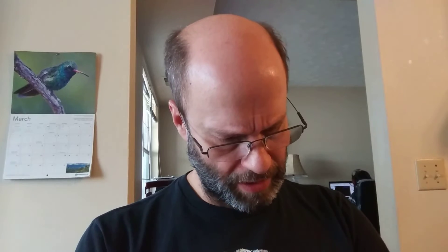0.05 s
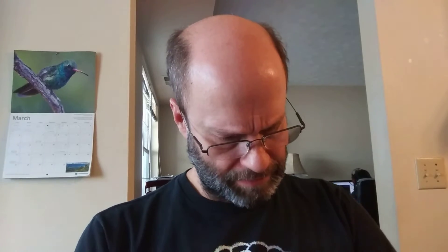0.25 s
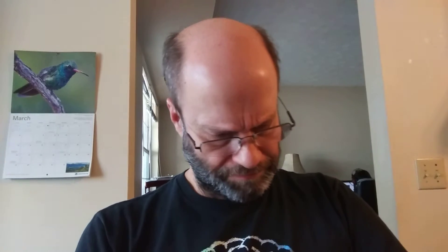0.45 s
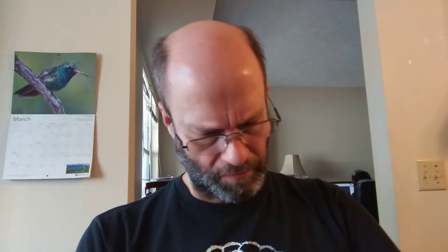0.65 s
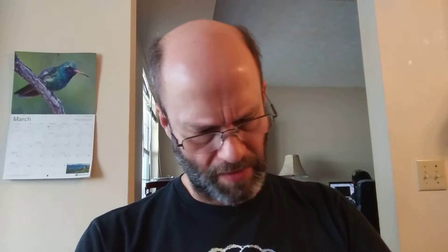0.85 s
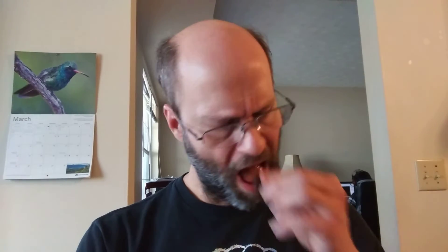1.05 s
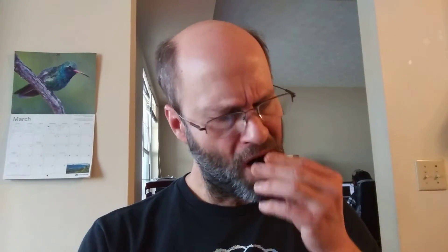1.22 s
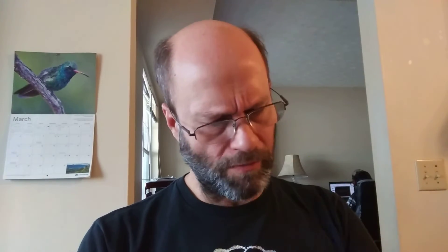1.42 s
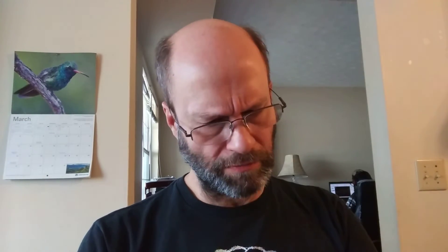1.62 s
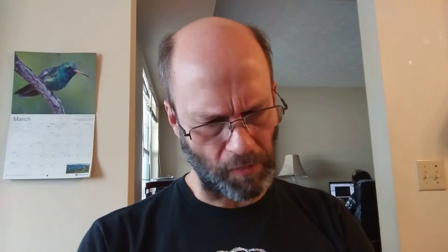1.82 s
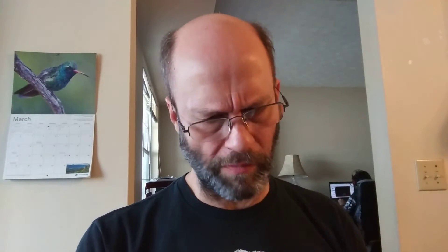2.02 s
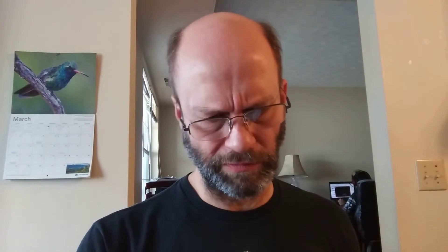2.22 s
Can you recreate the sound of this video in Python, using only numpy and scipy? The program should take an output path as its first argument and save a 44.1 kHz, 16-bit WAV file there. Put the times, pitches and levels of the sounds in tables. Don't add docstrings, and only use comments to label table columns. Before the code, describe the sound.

One crisp, brittle chocolate snap rings briefly in a small, hard-walled room, after tiny foil ticks and before quiet rustling, soft hand knocks and a light tooth click, close to a small microphone with faint hiss.

```python
import sys
import numpy as np
from scipy import signal
from scipy.fft import rfft, irfft, next_fast_len
from scipy.io import wavfile
from scipy.ndimage import uniform_filter1d, map_coordinates

SR = 44100
rng = np.random.default_rng(int(sys.argv[2]) if len(sys.argv) > 2 else 0)


def wav_out(sig):
    wavfile.write(sys.argv[1], SR, np.round(np.clip(np.atleast_2d(sig).T, -1, 1) * 32767).astype(np.int16))


def linear_from_db(decibels):
    return 10 ** (np.asarray(decibels, float) / 20)


N = 100107

# start_s, level_db
CRACKS = [
    (.4055, -9),
    (.4063, -6),
    (.40675, -7),
    (.4072, -9),
    (.4081, -9),
    (.409, -11),
    (.4105, -18),
    (.412, -20),
]
# pitch_hz, level_db, t60_s
BAR_MODES = [(361.8, -24, 0.023), (689.5, -20, 0.025), (1046, -18.5, 0.0092), (1870, -12.5, 0.012),
             (3030, -15, .01), (4488, -7.5, 0.0043), (6970, -11, 0.0059), (9950, -15, 0.002),
             (13900, -18, 0.0036)]
# start_s, peak_db
GLINTS = [(.4142, -6.5), (0.4167, -2), (0.418, -6.5), (0.4202, -5.5), (0.4218, -6.5), (0.4238, -8),
          (0.4284, -7), (0.43, -8.5), (0.4312, -10.5), (0.4336, -8.5), (0.4355, -11), (0.4382, -10.5),
          (0.4395, -10.5), (0.4405, -9), (0.4459, -12.5), (0.4474, -12.5), (0.4489, -10), (0.4505, -13.5),
          (0.4522, -13), (0.4558, -14), (0.4613, -15), (0.4648, -16), (0.4717, -17), (0.4734, -16.5),
          (0.4756, -18), (0.4779, -16), (0.4823, -20.5)]
# delay_s, level_db
WALLS = [(.0088, -5.5), (.0115, -10), (0.0124, -15.5), (0.013, -9), (0.0225, -11), (.033, -9.5),
         (0.042, -14)]
# pitch_hz, level_db, t60_s
ROOM_MODES = [(228, -30.5, 0.26), (253, -34.5, 0.17), (325, -33.5, 0.15)]
# frequency_hz, level_db
SNAP_POWER = [(150, -20), (230, 2.5), (450, -1), (1500, 2), (2800, -3.5), (4400, 5.5), (6500, -2),
              (15000, -8)]
# frequency_hz, t60_s
ROOM_T60 = [(150, 0.17), (300, 0.24), (1000, 0.28), (4000, .28), (8000, 0.27), (15000, 0.22)]
# start_s, peak_db, pitch_hz, t60_s, broad_db
TICKS = [(0.0525, -47, 2600, 0.0036, -11), (0.235, -36.5, 3930, 0.0061, -7.5),
         (.2351, -37, 2311, 0.0046, -7.5), (0.2357, -46.5, 7000, 0.011, -1), (0.237, -48, 3070, 0.011, -6),
         (.2465, -54.5, 4200, 0.0087, -16), (.298, -62, 3020, 0.0067, -2), (.585, -40, 2000, 0.012, 2.5),
         (0.663, -53.5, 5400, 0.0094, -3.5), (.8045, -44, 4520, .01, -13.5), (.8225, -45, 2600, 0.006, -8),
         (0.8921, -55.5, 2600, 0.014, 3), (0.9341, -52.5, 11420, 0.0076, -1.5),
         (.935, -59, 7100, 0.017, -3), (.992, -49, 3800, 0.0076, -1), (1.0032, -49, 7430, 0.011, -3),
         (1.0098, -50, 8830, .007, -4.5), (1.0165, -47.5, 8200, 0.01, -5), (1.0166, -51, 11800, 0.011, -2),
         (1.0165, -46, 2000, 0.015, -4), (1.377, -61, 8790, 0.009, -23)]
# start_s, peak_db, pitch_hz, t60_s, broad_db
BITES = [(1.419, -57, 3200, 0.0073, -11), (1.4215, -58.5, 2000, .008, -8.5), (1.4785, -51, 1773, .008, -2),
         (1.5465, -37.5, 2500, 0.0065, -6.5), (1.548, -53, 4280, .012, 5), (1.549, -45, 2190, 0.0065, -3.5),
         (1.551, -47.5, 3000, 0.011, -10), (1.555, -53, 3000, 0.0073, -4), (1.559, -48, 2500, 0.0074, 3),
         (1.5605, -56, 1510, .012, -2), (1.563, -49, 2500, 0.0095, 3), (1.66, -48, 1640, 0.02, 1),
         (1.675, -46, 3000, 0.011, 4), (1.6779, -31, 10500, 0.0075, 2), (1.678, -36, 14800, 0.0052, -8),
         (1.677, -37.5, 2410, 0.013, 2.5), (1.6795, -36.5, 3200, 0.0083, 2), (1.686, -36, 9800, 0.0073, -4),
         (1.6895, -34, 3020, 0.0053, 6.5), (1.6905, -41, 2500, 0.007, -3), (1.6925, -45, 1100, 0.013, 5.5),
         (1.685, -49, 2500, .015, -10), (1.6917, -47, 9900, 0.017, 3), (1.767, -52, 2550, 0.031, -16.5),
         (1.8945, -46, 10020, 0.008, -5), (1.8965, -47, 9810, 0.0064, 0.5),
         (1.8988, -45, 10000, .014, -4.5)]
# start_s, length_s, peak_db, pitch_hz, roughness (0-1)
SQUEAKS = [(0.071, .003, -54.5, 3350, 0.4), (0.08, 0.0059, -61.5, 8500, 1.04),
           (.104, 0.0045, -45, 1956, 0.2), (0.106, .003, -60, 3700, .2), (0.109, .003, -56, 3610, .4),
           (.993, 0.0055, -51.5, 2000, 0.17), (.994, 0.0027, -62, 7900, 0.53),
           (1.0067, 0.0098, -48.5, 2115, 0.26), (1.008, 0.0068, -50, 3810, 0.33),
           (1.075, 0.005, -57.5, 8460, 0.5), (1.0784, 0.0053, -54, 3700, .25),
           (1.482, 0.0049, -55, 2900, 0.1), (1.48, 0.0073, -63.5, 4400, 0.15),
           (1.898, 0.0067, -47, 2540, 0.05), (1.899, 0.0088, -49.5, 3720, 0.3),
           (1.896, .008, -55, 7000, 0.34)]
# start_s, rise_s, hold_s, fall_s, level_db
RUSTLES = [(.0, 0.0023, 0.16, 0.017, -69.5), (0.113, 0.014, 0.033, 0.0055, -65),
           (0.165, 0.017, 0.1, 0.045, -75), (0.37, 0.012, 0.03, .003, -62.5),
           (0.599, 0.024, 0.24, 0.1, -74), (0.728, 0.076, 0.008, 0.022, -50.5),
           (0.852, 0.035, 0.12, 0.079, -78.5), (0.983, 0.025, 0.0094, 0.043, -63.5),
           (1.15, 0.032, .05, 0.057, -77.5), (1.217, 0.017, 0.057, .05, -72),
           (1.548, 0.0018, 0.03, 0.021, -74), (1.616, 0.0015, .02, 0.0059, -60.5),
           (1.655, 0.0049, 0.03, 0.043, -55.5), (1.716, 0.04, 0.024, 0.04, -63.5),
           (1.88, 0.021, 0.0037, 0.0097, -53.5), (2.232, 0.017, 0.026, 0.011, -74)]
# resonance_hz, width_hz, broad_db
RUSTLE_COLOUR = [(3700, 880, -10), (5180, 3000, -3.5), (3500, 2400, -16), (4540, 2500, -12.5),
                 (2000, 3400, -20.5), (4560, 800, -3), (7000, 1100, 10), (2190, 2500, -17.5),
                 (3946, 2940, -12), (1055, 64, -16.5), (2500, 2500, -25), (2500, 2900, -1),
                 (2500, 7200, -5), (2600, 2100, -4), (2600, 890, -3), (2000, 1100, -14)]
# start_s, peak_db, pitch_hz, t60_s
KNOCKS = [(.174, -36, 400, 0.0065), (0.577, -31, 186, 0.021), (.584, -38, 423, 0.019),
          (0.822, -35.5, 312, 0.024), (1.478, -34, 306, 0.017), (1.547, -30.5, 301, 0.015),
          (1.009, -50, 250, 0.033), (1.51, -50, 296.4, 0.033), (1.689, -33.5, 352, 0.017),
          (1.767, -53.5, 330, 0.073), (1.902, -44.5, 523, 0.016)]
# frequency_hz, density_db (per Hz)
FLOOR_SPECTRUM = [(18, -54.5), (60, -38.5), (233, -4), (364, -2), (404, -4), (822, -9.5), (1280, -11.5),
                  (6380, -28), (16000, -28)]
# pitch_hz, level_db (rms)
WHINE = [(7192, -96), (9593, -80.5), (11989, -90), (14390, -92)]

SNAP_NOISE_DB, SNAP_NOISE_T60_S = -9, 0.0091
GLINT_DB, GLINT_T60_S, GLINT_HZ, GLINT_WIDTH_HZ = -7, 0.0025, 3500, 5700
WALL_DULL_HZ = 11600
TAIL_START_S, TAIL_RISE_S, TAIL_DB = 0.008, 0.0019, 12
SMALL_TAIL_DB, SMALL_WALL_DB = -15, -19
FLOOR_DB = -62
LOW_CUT_HZ, SUB_CUT_HZ, TOP_HZ, LEAK_DB = 190, 92, 15800, -36.5


def unit(x):
    return x / np.sqrt(np.mean(x ** 2) + 1e-20)


def along(points, hz):
    f, values = np.transpose(points)
    return np.interp(np.log(hz + 1), np.log(f + 1), values)


def filtered(x, response):
    size = next_fast_len(len(x) + 8192)
    spectrum = rfft(x, size) * response(np.fft.rfftfreq(size, 1 / SR))
    return irfft(spectrum, size)[:len(x)]


def peak(hz, width_hz):
    return lambda f: 1j * f * width_hz / (hz * hz - f * f + 1j * f * width_hz)


def sine(hz, t):
    return np.sin(2 * np.pi * hz * t)


def seconds(size):
    return np.arange(size) / SR


def add(track, s, piece):
    part = track[max(round(s * SR), 0):][:len(piece)]
    part += piece[:len(part)]


def wobble(rate_hz, size):
    points = rng.standard_normal(int(size * rate_hz / SR) + 4)
    return map_coordinates(points, [np.arange(size) * rate_hz / SR])


def snap():
    out, t = np.zeros(N), seconds(SR // 8)
    for s, db in CRACKS:
        ring = 0
        for hz, level, t60 in BAR_MODES:
            struck_db = level + rng.normal(0, 2.3)
            ring = ring + linear_from_db(struck_db - 60 * t / t60) * sine(hz, t)
        spit = linear_from_db(SNAP_NOISE_DB - 60 * t / SNAP_NOISE_T60_S) * rng.standard_normal(len(t))
        add(out, s, linear_from_db(db) * (ring + spit))
    return out


def glints():
    out, t = np.zeros(N), seconds(SR // 100)
    for s, db in GLINTS:
        spit = rng.standard_normal(len(t)) * linear_from_db(-60 * t / GLINT_T60_S)
        spike = filtered(spit, peak(GLINT_HZ * linear_from_db(rng.normal(0, 3)), GLINT_WIDTH_HZ))
        add(out, s, linear_from_db(db + GLINT_DB) * spike / np.abs(spike).max())
    return out


def walls(x):
    def echoes(f):
        delayed = sum(linear_from_db(db) * np.exp(-2j * np.pi * f * s) for s, db in WALLS)
        return delayed / (1 + 1j * f / WALL_DULL_HZ)
    return filtered(x, echoes)


def room_modes():
    out, t = np.zeros(N), seconds(SR // 2)
    waves = sum(linear_from_db(db - 60 * t / t60) * sine(hz, t) for hz, db, t60 in ROOM_MODES)
    add(out, CRACKS[0][0], waves * (1 - np.exp(-t / 0.004)))
    return out


def tail():
    hz, t, z = signal.stft(rng.standard_normal(SR // 2), SR, nperseg=256)
    decay = linear_from_db(-60 * t / along(ROOM_T60, hz)[:, None])
    noise = signal.istft(z * decay, SR, nperseg=256)[1]
    noise = noise * (1 - np.exp(-seconds(len(noise)) / TAIL_RISE_S))
    return np.pad(noise / np.linalg.norm(noise), (round(TAIL_START_S * SR), 0))


def ticks():
    out, t = np.zeros(N), seconds(SR // 20)
    for s, db, hz, t60, broad_db in TICKS + BITES:
        fall = linear_from_db(-60 * t / t60) * (1 - np.exp(-t / (0.015 * t60)))
        narrow = peak(hz, 0.4 * hz)
        broad = peak(hz, 1.5 * hz * linear_from_db(broad_db))
        rough = unit(filtered(rng.standard_normal(len(t)), lambda f: narrow(f) ** 2))
        spit = unit(filtered(rng.standard_normal(len(t)), lambda f: broad(f) ** 2))
        piece = fall * (sine(hz, t) + 0.35 * rough + linear_from_db(broad_db) * spit)
        add(out, s, linear_from_db(db) * piece / np.abs(piece).max())
    return out


def squeaks():
    out, t = np.zeros(N), seconds(SR // 50)
    for s, length, db, hz, rough in SQUEAKS:
        band = peak(hz, 0.3 * hz)
        noise = unit(filtered(rng.standard_normal(len(t)), lambda f: band(f) ** 2))
        shape = np.sin(np.pi * np.clip(t / length, 0, 1) ** 0.7)
        add(out, s, linear_from_db(db) * shape * ((1 - rough) * sine(hz, t) + rough * noise))
    return out


def rustles():
    out, size = np.zeros(N), SR // 4
    t = seconds(size)

    def broad(f):
        return peak(2500, 5500)(f) - 0.7 * peak(11000, 6000)(f)
    for (s, rise, hold, fall, db), (hz, width_hz, broad_db) in zip(RUSTLES, RUSTLE_COLOUR):
        swell = np.clip(t / rise, 0, 1) ** 2.2
        fade = linear_from_db(-20 * np.clip(t - rise - hold, 0, None) / fall)
        grains = rng.standard_normal((2, size)) * linear_from_db(1.5 * wobble(450, size))
        sound = unit(filtered(grains[0], peak(hz, width_hz)))
        sound = sound + linear_from_db(broad_db) * unit(filtered(grains[1], broad))
        add(out, s, linear_from_db(db) * swell * fade * unit(sound))
    return out


def knocks():
    out, t = np.zeros(N), seconds(SR // 5)
    for s, db, hz, t60 in KNOCKS:
        add(out, s, linear_from_db(db - 60 * t / t60) * (1 - np.exp(-t / 0.0029)) * sine(hz, t))
    return out


def floor():
    z = signal.stft(rng.standard_normal(N), nperseg=512)[2]
    patches = uniform_filter1d(rng.standard_normal(z.shape), 6, 0)
    patches = uniform_filter1d(patches, 14, 1)
    noise = signal.istft(z * linear_from_db(0.51 * unit(patches)), nperseg=512)[1][:N]
    hiss = unit(filtered(noise, lambda f: linear_from_db(along(FLOOR_SPECTRUM, f))))
    t, whine = seconds(N), np.zeros(N)
    for hz, db in WHINE:
        drift = 0.39 * wobble(20, N)
        whine += np.sqrt(2) * linear_from_db(db) * np.sin(2 * np.pi * hz * t + drift)
    return linear_from_db(FLOOR_DB + wobble(4.9, N) / 2) * hiss + whine


def scene():
    bar = snap()
    small = ticks() + squeaks() + rustles() + knocks()
    far = np.zeros(N)
    snap_tail = filtered(tail(), lambda f: linear_from_db(along(SNAP_POWER, f)))
    add(far, CRACKS[1][0], linear_from_db(TAIL_DB) * snap_tail)
    small_room = linear_from_db(SMALL_WALL_DB) * walls(small)
    small_room = small_room + linear_from_db(SMALL_TAIL_DB) * signal.fftconvolve(small, tail())[:N]

    def low_cut(f):
        return 1j * peak(LOW_CUT_HZ, 1.26 * LOW_CUT_HZ)(f) ** 3 * (f / LOW_CUT_HZ) ** 3
    sources = bar + walls(bar) + far + glints() + room_modes() + small + small_room
    return (filtered(sources, low_cut) + floor())[None]


def low_pass(x):
    return signal.sosfilt(signal.butter(12, 16970, fs=SR, output="sos"), x)


def record(dry):
    x = dry[0] / (1 + np.abs(dry[0] / 0.7) ** 4) ** (1 / 4)

    def band(f):
        top = linear_from_db(LEAK_DB) + 1 / (1 + (f / TOP_HZ) ** 200)
        return top * 1j * f / (SUB_CUT_HZ + 1j * f)
    mix = filtered(x, band)[None]
    return low_pass(mix)


dry = scene()
out = record(dry)
wav_out(out)
```